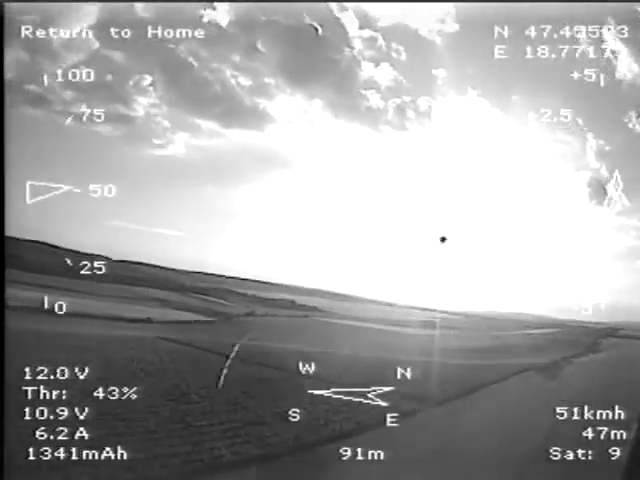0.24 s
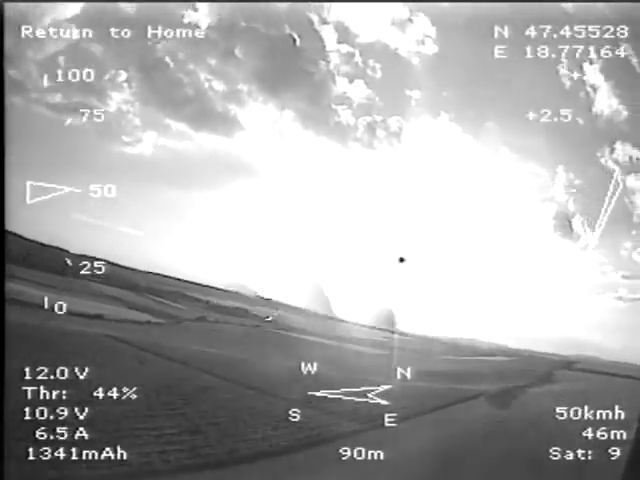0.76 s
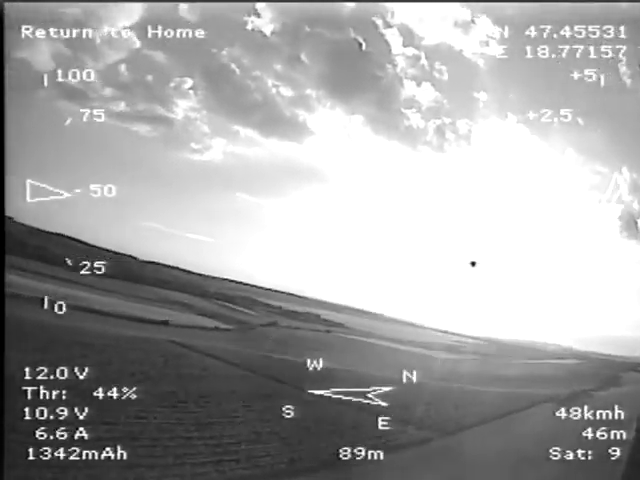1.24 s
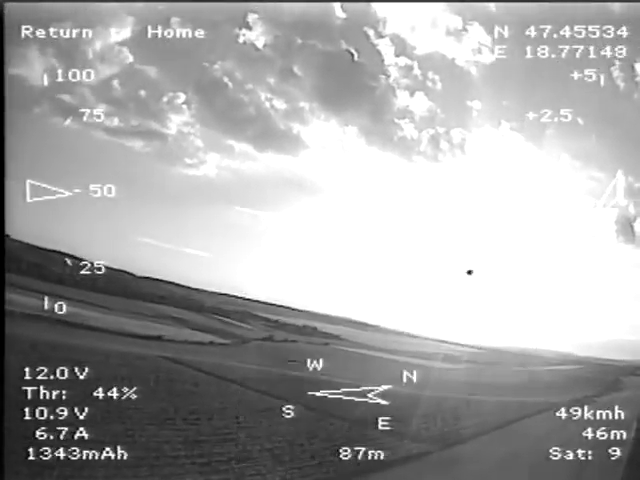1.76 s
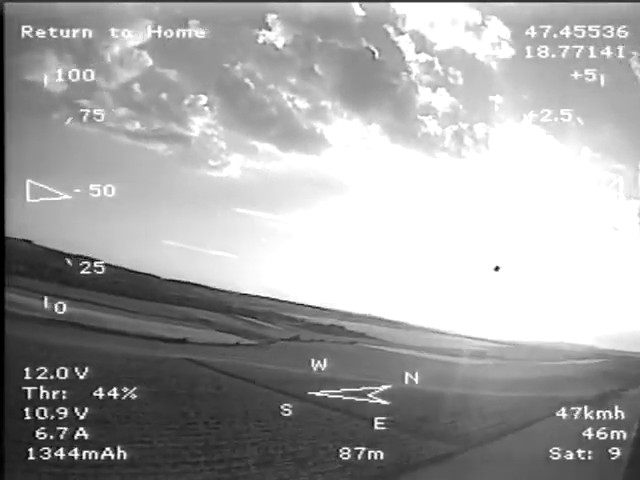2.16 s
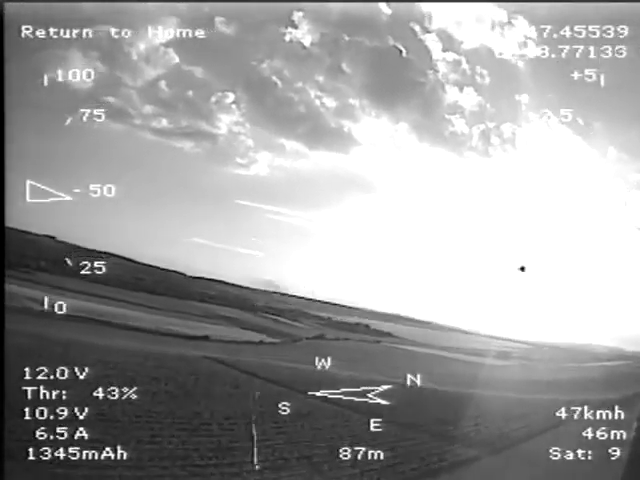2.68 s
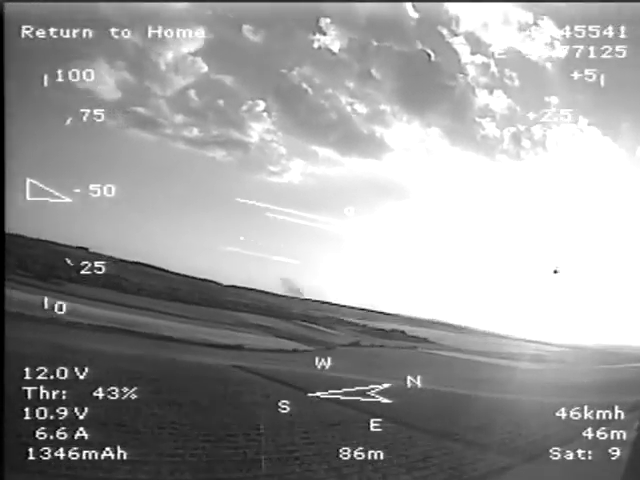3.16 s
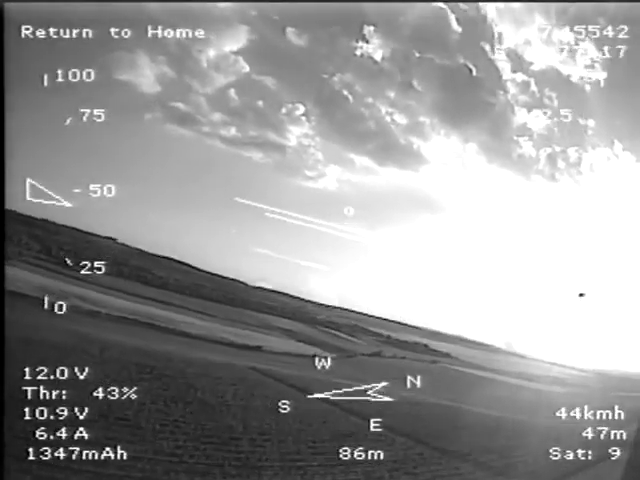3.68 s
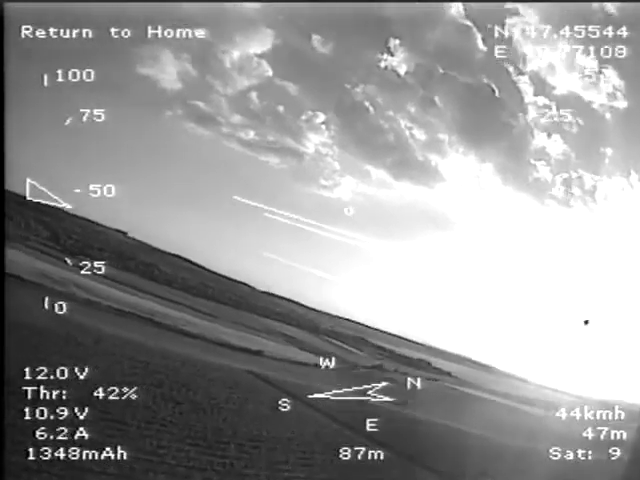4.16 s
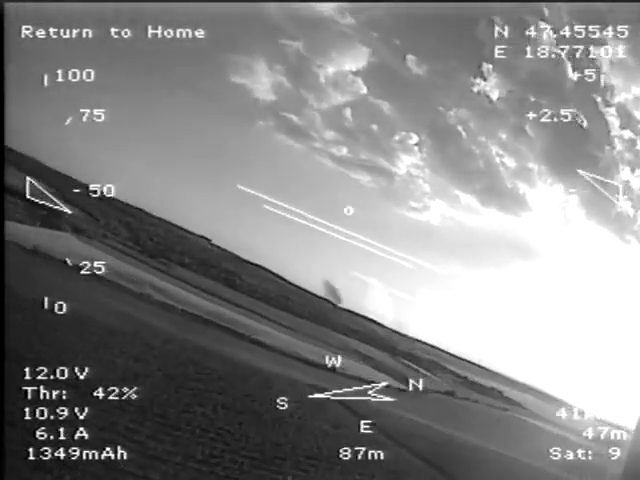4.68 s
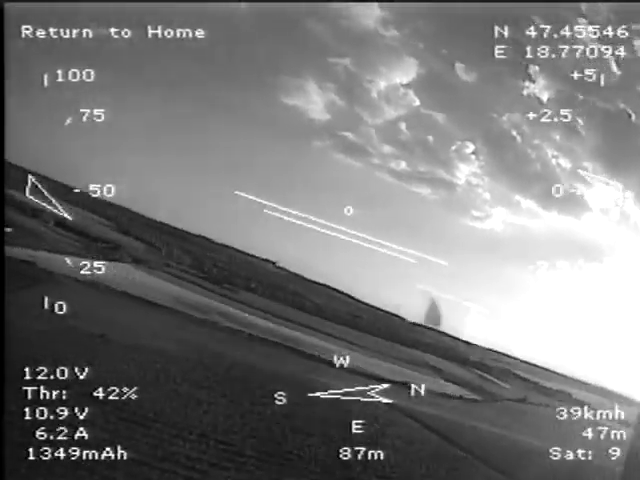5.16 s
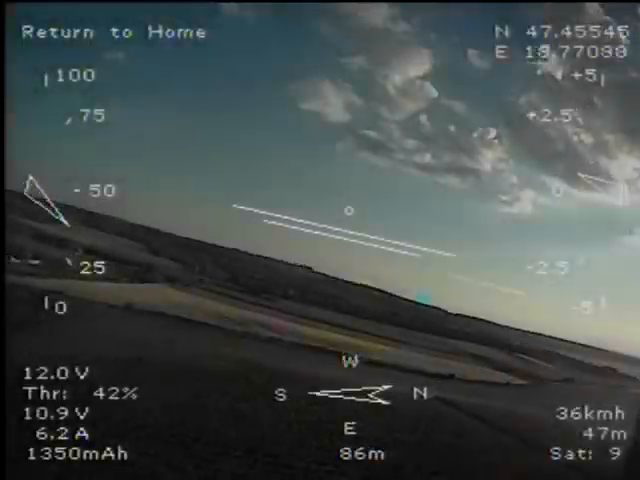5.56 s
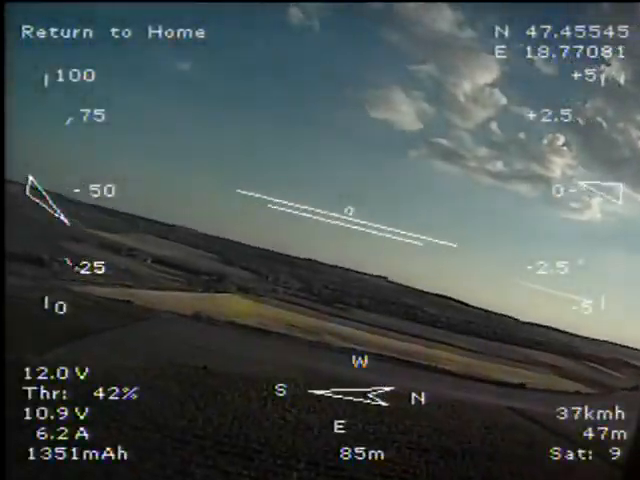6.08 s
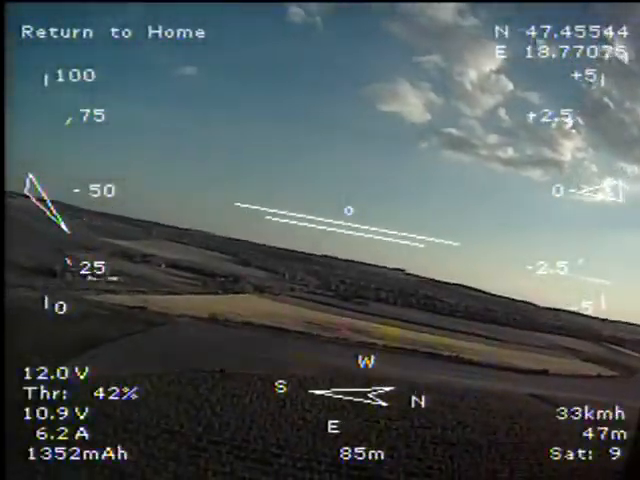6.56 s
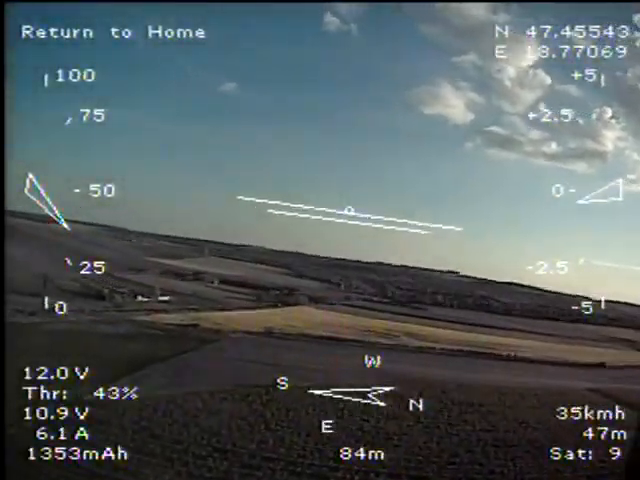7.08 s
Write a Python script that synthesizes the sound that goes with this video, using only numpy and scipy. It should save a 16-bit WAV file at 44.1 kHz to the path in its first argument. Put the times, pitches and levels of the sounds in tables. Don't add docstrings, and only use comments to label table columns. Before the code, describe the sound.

Rough, crackling static from a small electric plane's analogue video link pulses as a fast, fluttering buzz over a very high, thin whine. The crackle surges and eases unevenly, with dull knocks under the strongest bursts. It turns thinner and more continuous as the plane banks, then sharp pops break through. Just after five seconds it stops dead, leaving faint whine, soft rapid ticking and hiss. There is no microphone or room, only interference inside the link.

```python
import sys
import numpy as np
from scipy import signal
from scipy.fft import rfft, irfft
from scipy.io import wavfile
from scipy.ndimage import uniform_filter1d

SR = 44100
rng = np.random.default_rng(int(sys.argv[2]) if len(sys.argv) > 2 else 0)


def to_wav(sig):
    pcm = np.clip(np.atleast_2d(sig), -1, 1) * 32767
    pcm = np.round(pcm).astype(np.int16)
    wavfile.write(sys.argv[1], SR, pcm.T)


def field_ratio(decibels):
    return 10 ** (np.asarray(decibels, dtype=float) / 20)


N = 322812

LINE_HZ, LINES_PER_FIELD = 15624.6, 312.5
BANK_S = (4.34, 5)
EDGES_GONE_S = 4.55
EXPOSURE_DROP_S = 5.3367

# start_s, crackle_level_db, spill_onto_ground_rows_db
OVERDRIVE = [(0, -18.5, -4), (.16, -18.5, -4), (.29, -12.5, -3.5), (.53, -16, -1), (.8, -20.5, 1),
             (1.05, -19, -4), (1.46, -13, 3), (1.6, -20.5, -4), (1.78, -26, 2), (1.96, -20.5, 3),
             (3.38, -21.5, -5.5), (3.49, -18.5, 7), (3.55, -21.5, 1), (3.98, -17.5, 2), (4.43, -22, 7),
             (4.56, -21.5, 5.5), (4.68, -19.5, 2), (5.33, -17.5, -2.5)]
# frequency_hz, level_db (per Hz)
DROPOUT_SPECTRUM = [(24, -19), (60, -20), (174, -21), (400, -16.5), (800, -7), (1300, -2.5), (2500, -2.5),
                    (5000, -6), (7500, -9), (10000, -11.5), (14000, -16), (17300, -16)]


def columns(rows, x):
    first, *rest = np.transpose(rows)
    return [np.interp(x, first, c) for c in rest]


def held(rows, t):
    start, *rest = np.transpose(rows)
    row = np.searchsorted(start, t, "right") - 1
    return [uniform_filter1d(c[row], size=SR // 10) for c in rest]


def filtered(x, order, hz, kind):
    return signal.sosfilt(signal.butter(order, hz, kind, fs=SR, output="sos"), x)


def coloured(x, spectrum):
    hz = np.maximum(np.fft.rfftfreq(4096, 1 / SR), 1)
    points = np.array(spectrum, float)
    log_gain = np.log(field_ratio(np.interp(np.log(hz), np.log(points[:, 0]), points[:, 1])))
    cepstrum = irfft(log_gain)
    cepstrum[1:2048] *= 2
    cepstrum[2049:] = 0
    response = irfft(np.exp(rfft(cepstrum)))
    return signal.fftconvolve(x, response / np.sqrt(np.sum(response ** 2)))[:N]


def field_clock():
    t = np.arange(N) / SR
    fields = t * LINE_HZ / LINES_PER_FIELD
    return t, fields.astype(int), fields % 1 * 20


def hump(ms, centre_ms, width_ms):
    away = (ms - centre_ms + 10) % 20 - 10
    return np.exp(-.5 * (away / width_ms) ** 2)


def edges(t):
    # start_s, lower_edge_ms, upper_edge_ms
    edge_path = [(0, 2.5, 15.3), (.4, 2.7, 15.8), (.9, 3.2, 15.9), (2, 3.1, 16.35), (2.9, 2.5, 16.7),
                 (3.7, 2.0, 17.75), (4.02, 2.3, 18.3), (4.26, 2.0, 19.0), (4.4, .7, 20.2)]
    banked_ms = (2.6, 19.0)
    return [np.where(t < EDGES_GONE_S, ms, banked) for ms, banked in zip(columns(edge_path, t), banked_ms)]


def glare_levels(t, ms):
    # centre_s, jump_db
    flashes = [
        (1.12, 3),
        (1.95, 1.5),
        (3.47, 1),
        (4.41, 1.5),
    ]
    flash_s = 0.02
    edge_over_db, ground_over_db = 10, -0.5
    sky_floor_db, sky_under_db = -31.5, -7
    flood_start_s, flood_rise_s = 4.53, 0.094
    flood_ground_db, flood_sky_db, flood_tilt_db = 4, (-2.5, -0.5), 2.5

    drive_db, spill_db = columns(OVERDRIVE, t)
    drive_db = drive_db + sum(db * np.exp(-.5 * ((t - s) / flash_s) ** 2) for s, db in flashes)
    knots = np.arange(0, 8, .12)
    lean_db = 2 * np.interp(t, knots, rng.standard_normal(len(knots)))
    flood = np.clip((t - flood_start_s) / flood_rise_s, 0, 1)
    open_sky_db = 10 * np.log10(field_ratio(sky_floor_db) ** 2 + field_ratio(drive_db + sky_under_db) ** 2)
    flooded_sky_db = drive_db + np.interp(t, [flood_start_s, EXPOSURE_DROP_S], flood_sky_db)
    flooded_sky_db = flooded_sky_db - flood_tilt_db * np.tanh((ms - 12.5) / 2)
    sky_db = open_sky_db + flood * (flooded_sky_db - open_sky_db)
    ground_db = drive_db + spill_db + ground_over_db + flood * flood_ground_db
    edge_db = drive_db + edge_over_db
    return edge_db + lean_db, edge_db - lean_db, ground_db, sky_db


def crackle(edge_ms, flicker_db, wander_ms, size_db):
    blank_ms, blank_db = (4.7, 5.8), -4
    clicks_per_s, thin_from_s, thin_share = 14000, 4.6, .5
    edges_fade_s = .1

    t, field, ms = field_clock()
    low_ms, high_ms = edges(t)
    spread = 0.95 + 1 / (low_ms + 20 - high_ms)
    low_db, high_db, ground_db, sky_db = glare_levels(t, ms)
    chance = rng.standard_normal((field[-1] + 1, 6))[field].T
    low_ms = low_ms + wander_ms * chance[0]
    high_ms = high_ms + wander_ms * chance[1] - .25

    on_ground = (ms > high_ms) | (ms < low_ms + edge_ms)
    ground_place = np.clip((ms - high_ms) % 20 / (low_ms + 20 - high_ms), 0, 1)
    ground_slope_db = 7 * (t < EDGES_GONE_S) * (ground_place - .5)
    ground_rows_db = ground_db + ground_slope_db + flicker_db * chance[2]
    sky_rows_db = sky_db + 0.7 * flicker_db * chance[3]
    rows_db = np.where(on_ground, ground_rows_db, sky_rows_db)
    rows_db = rows_db + blank_db * ((ms > blank_ms[0]) & (ms < blank_ms[1]))
    power = field_ratio(uniform_filter1d(rows_db, size=31)) ** 2

    fade = np.clip((EDGES_GONE_S - t) / edges_fade_s, 0, 1) ** 2
    for at_ms, edge_db, luck in ((low_ms, low_db, chance[4]), (high_ms, high_db, chance[5])):
        excess = np.maximum(field_ratio(edge_db) ** 2 - field_ratio(ground_db) ** 2, 0) * fade
        power = power + 1.16 * excess * field_ratio(2 * flicker_db * luck) * hump(ms, at_ms, edge_ms * spread)

    sizes = field_ratio(size_db * np.minimum(rng.exponential(1, N), 2.5)) * rng.choice([-1, 1], N)
    thinning = np.clip((t - thin_from_s) / (EXPOSURE_DROP_S - thin_from_s), 0, 1) ** 2
    per_s = clicks_per_s * (1 - thin_share * thinning)
    clicks = sizes * (rng.random(N) < per_s / SR) / np.sqrt(per_s)
    glare = t < EXPOSURE_DROP_S
    return coloured(clicks / clicks.std() * np.sqrt(power) * glare, DROPOUT_SPECTRUM) * glare


def thinned(noise):
    flood = np.interp(np.arange(N) / SR, BANK_S, [0, 1])
    thin = filtered(noise, 1, 450, "high")
    return noise + .55 * flood * (thin - noise)


def pops(length_ms, gain_db):
    # start_s, peak_db
    pop_times = [
        (5.189, -0.5),
        (5.2272, 4),
        (5.2307, 3.5),
        (5.248, -10),
        (5.2672, -1),
        (5.269, 9.5),
        (5.2713, -10),
        (5.2853, -3),
        (5.309, 6.5),
        (5.327, -13),
    ]
    t = np.arange(N) / SR
    envelope = np.zeros(N)
    for start_s, peak_db in pop_times:
        lengths_in = (t - start_s) * 1000 / length_ms
        envelope += field_ratio(peak_db + gain_db) * np.exp(-.5 * (lengths_in - 1) ** 2)
    return coloured(envelope * rng.standard_normal(N), DROPOUT_SPECTRUM)


def thumps(noise, thump_db, top_hz):
    field = field_clock()[1]
    way = rng.uniform(-0.16, 1, field[-1] + 1)[field]
    push = way * np.minimum(noise ** 2, .4)
    return field_ratio(thump_db) * filtered(push, 2, [30, top_hz], "band")


def whine_level(t):
    drive_db = columns(OVERDRIVE, t)[0]
    glare_db = -16.3 - 4.5 * (t / EXPOSURE_DROP_S) ** 3 + .1 * (drive_db + 21)
    settle_s = .25
    dim_db = -30 + 2.1 * np.exp(-np.maximum(t - EXPOSURE_DROP_S, 0) / settle_s)
    return np.where(t < EXPOSURE_DROP_S, glare_db, dim_db)


def whine(edge_db, edge_ms, ground_db, shake):
    # place_ms, level_flight_db, banked_db, dim_db
    contrast = [(1.5, -1, 0, -8), (3.6, 3, -10, -7), (4.5, -19, -27, -22), (5.5, -12, -6, -10),
                (6.1, -1, -1, -1), (13, 3.5, 4.5, 2.5), (15.5, 5, 5.5, 4.5), (18.5, 0, 0, -5),
                (21.5, -1, 0, -8)]
    # place_ms, level_flight_lines, banked_lines, dim_lines
    slip = [(0, .02, .13, .01), (3.6, .18, 0, .05), (5.5, .15, .12, .1), (6.1, 0, .03, .03),
            (13.5, -.02, -.12, -.02), (15.5, .03, -.19, -.1), (18.5, -.11, -.23, -.07), (20, .02, .13, .01)]

    t, field, ms = field_clock()
    first_ms = contrast[0][0]
    level_db, bank_db, dim_db = columns(contrast, (ms - first_ms) % 20 + first_ms)
    level_shift, bank_shift, dim_shift = columns(slip, ms)
    bank = np.interp(t, BANK_S, [0, 1])
    glare = t < EXPOSURE_DROP_S
    low_ms, high_ms = edges(t)
    level_db = level_db + edge_db * (hump(ms, low_ms + .15, edge_ms) - .7 * hump(ms, 3.4, edge_ms))
    level_db = level_db + ground_db * hump(ms, (low_ms + high_ms) / 2 - 10, 1.3)
    level_db = level_db + 3 * hump(ms, high_ms - .5, .25) - 4 * hump(ms, 4.3, .25)
    level_shift = level_shift + .1 * (hump(ms, high_ms - .4, .3) - hump(ms, high_ms + .5, .4))

    contrast_db = np.where(glare, level_db + bank * (bank_db - level_db), dim_db)
    shift = np.where(glare, level_shift + bank * (bank_shift - level_shift), dim_shift)
    wobble = shake * signal.lfilter([.1], [1, -.9], rng.standard_normal((2, N)))
    height = field_ratio(whine_level(t) + contrast_db) * (1 + wobble[0])
    return height * np.sin(2 * np.pi * (LINE_HZ * t + shift) + wobble[1])


def sync_buzz(sag_hz, top_hz):
    # place_ms, glare_step, dim_step (full scale 1)
    sync_steps = [
        (4.34, 0.118, 0.0225),
        (4.49, -0.098, -0.041),
        (4.68, 0.031, 0.011),
        (5.79, -0.07, -0.0225),
        (5.97, 0.089, 0.0165),
    ]
    # place_ms, length_ms, brightness (full scale 1)
    text_rows = [
        (.22, .3, .045),
        (.88, .39, .06),
        (1.64, .4, .1),
        (2.33, .5, .1),
        (3.13, .39, .09),
        (6.69, .36, -.04),
        (7.05, .34, .08),
    ]
    starts = np.arange(int(N / SR * 50)) * LINES_PER_FIELD / LINE_HZ
    growth = 1 + .8 * starts / EXPOSURE_DROP_S
    text_steps = []
    for place_ms, length_ms, brightness in text_rows:
        on, off = 0.55 * brightness, -0.6 * brightness
        text_steps.append((place_ms, on * growth, on * .065))
        text_steps.append((place_ms + length_ms, off * growth, off * .065))

    kicks = np.zeros(N + 900)
    for at_ms, glare_step, dim_step in sync_steps + text_steps:
        at = starts + at_ms / 1000
        kicks[np.round(at * SR).astype(int)] += np.where(at < EXPOSURE_DROP_S, glare_step, 1.15 * dim_step)
    steps = filtered(np.cumsum(kicks[:N]), 1, 260, "high")
    return filtered(steps, 1, [sag_hz, top_hz], "band")


def edge_buzz(swing_ms, sag_hz, chirp_ms):
    # start_s, lower_swing_db, upper_swing_db, half_line_chirp_db
    gain_steps = [
        (0, -14.5, -17, -19),
        (.7, -12.5, -13, -19),
        (1.6, -15, -13.5, -23),
        (2.65, -15.5, -16, -21.5),
        (3.4, -18, -24.5, -19.5),
        (4.45, -60, -49, -40),
    ]
    t, field, ms = field_clock()
    low_ms, high_ms = edges(t)
    low_db, high_db, chirp_db = held(gain_steps, t)
    low_swing = field_ratio(low_db) * hump(ms, low_ms + 0.34, swing_ms)
    high_swing = field_ratio(high_db) * hump(ms, high_ms - .2, swing_ms)
    buzz = filtered(low_swing + high_swing, 2, sag_hz, "high")
    chirp = field_ratio(chirp_db) * (hump(ms, low_ms, chirp_ms) + hump(ms, high_ms, chirp_ms))
    return (buzz + chirp * np.sin(np.pi * LINE_HZ * t)) * (t < EXPOSURE_DROP_S)


def motor_switching():
    switch_hz, flip_hz = 7685.6, 29.3
    t = np.arange(N) / SR
    flips = np.sign(np.sin(2 * np.pi * flip_hz * t))
    tone = field_ratio(-49) * flips * np.sin(2 * np.pi * switch_hz * t)
    octave = field_ratio(-45) * np.sin(2 * np.pi * 2 * switch_hz * t)
    return np.sqrt(2) * (tone + octave)


def hiss():
    # frequency_hz, level_db (per Hz)
    noise_spectrum = [(25, 1), (110, -6.5), (300, -1), (2000, -4), (6500, -3.5), (7750, 6), (8800, -3.5),
                      (13500, -2.5), (14700, -6), (15550, 13.5), (16300, 6.5), (17300, 0)]
    return field_ratio(-40) * coloured(rng.standard_normal(N), noise_spectrum)


def scene():
    noise = crackle(edge_ms=0.36, flicker_db=1.43, wander_ms=0.34, size_db=3.0)
    noise = thinned(noise) + pops(length_ms=0.21, gain_db=-5.5)
    knocks = thumps(noise, thump_db=-15, top_hz=274)
    picture = whine(edge_db=9.5, edge_ms=.5, ground_db=-4, shake=.055)
    picture = picture + sync_buzz(sag_hz=500, top_hz=4000)
    picture = picture + edge_buzz(swing_ms=0.16, sag_hz=350, chirp_ms=0.43)
    return (noise + knocks + picture + motor_switching() + hiss())[None]


def band_limit(x):
    return signal.sosfilt(signal.butter(12, 17090, fs=SR, output="sos"), x)


def record(dry):
    cut = signal.sosfilt(signal.cheby2(12, 60, 18600, fs=SR, output="sos"), dry)
    return band_limit(np.clip(cut, -1, 1))


dry = scene()
out = record(dry)
to_wav(out)
```